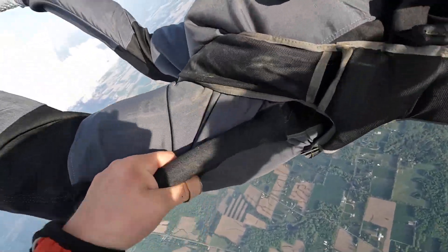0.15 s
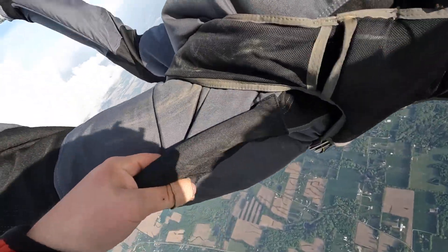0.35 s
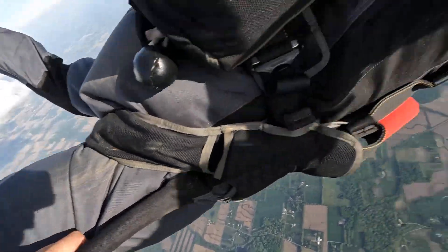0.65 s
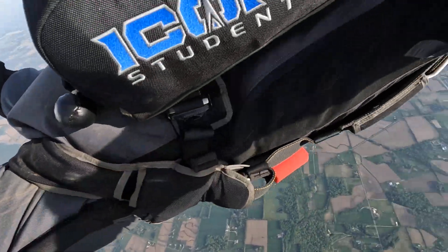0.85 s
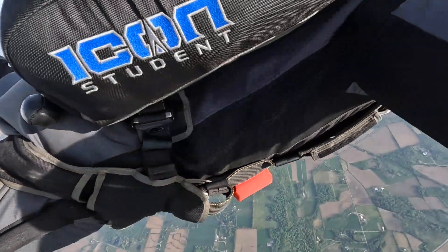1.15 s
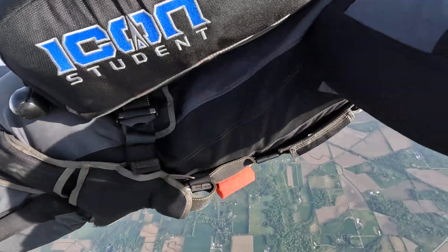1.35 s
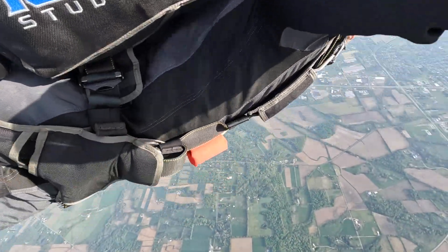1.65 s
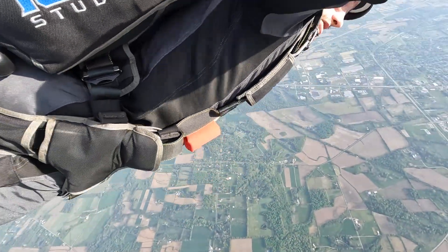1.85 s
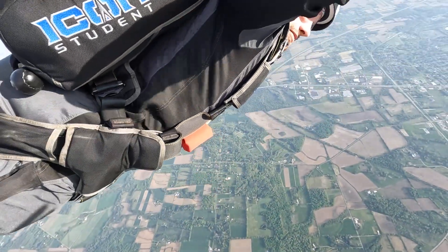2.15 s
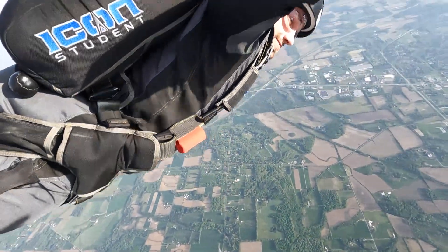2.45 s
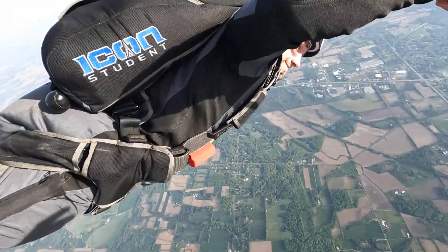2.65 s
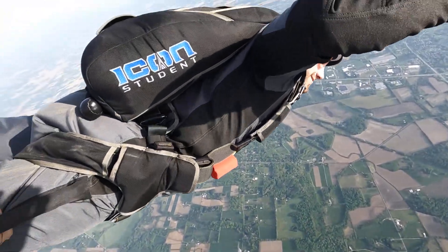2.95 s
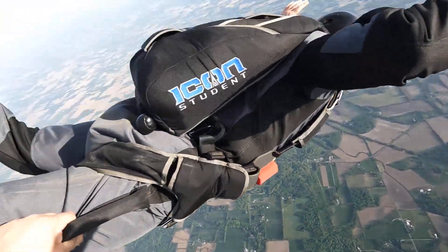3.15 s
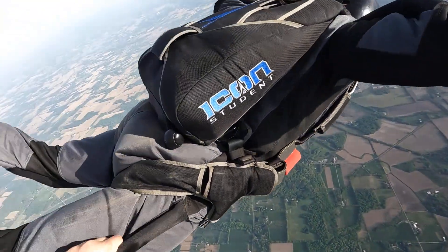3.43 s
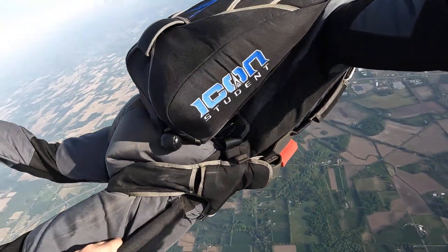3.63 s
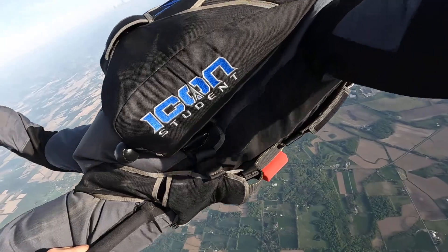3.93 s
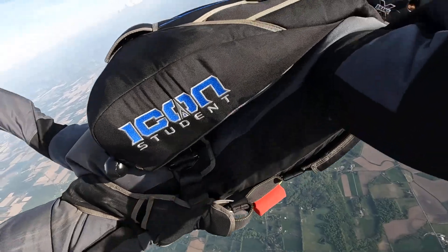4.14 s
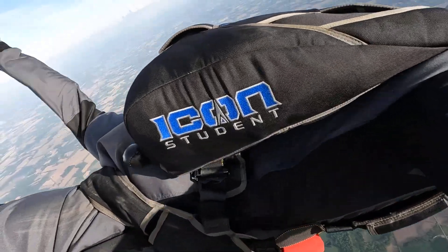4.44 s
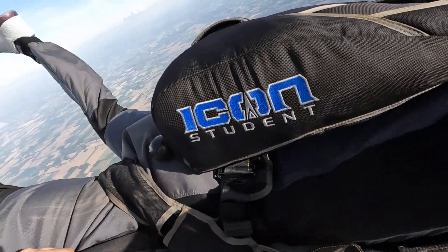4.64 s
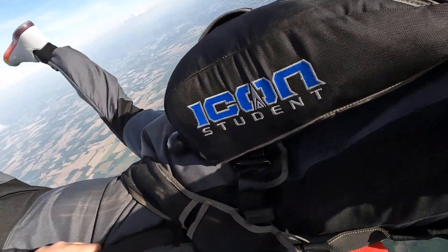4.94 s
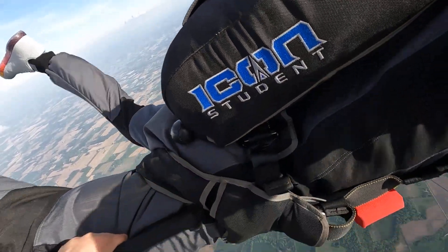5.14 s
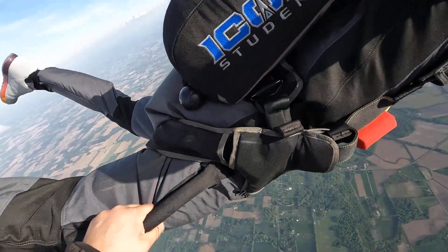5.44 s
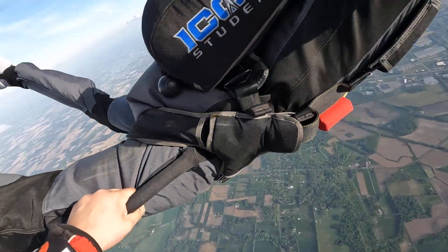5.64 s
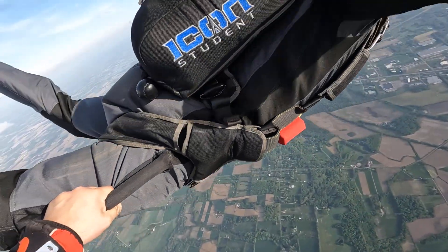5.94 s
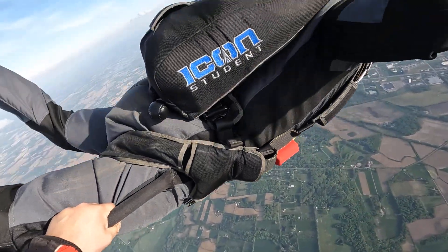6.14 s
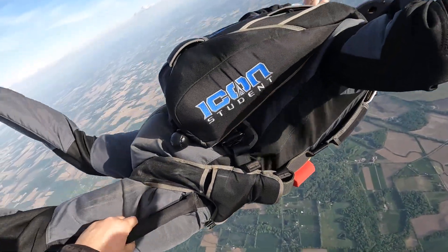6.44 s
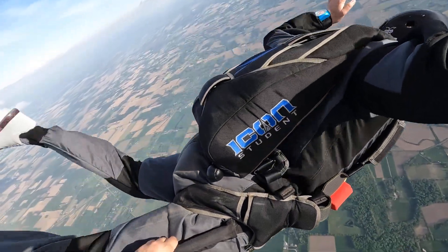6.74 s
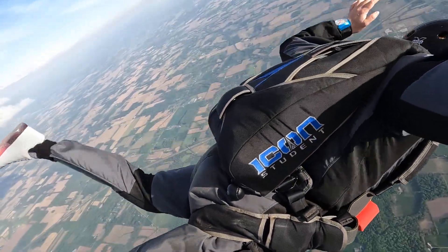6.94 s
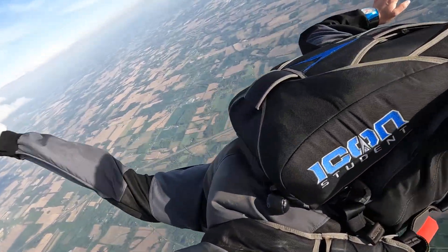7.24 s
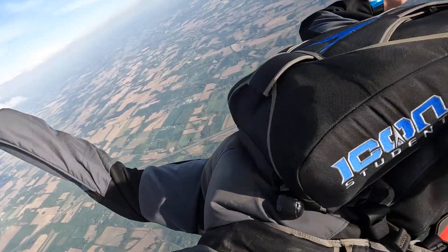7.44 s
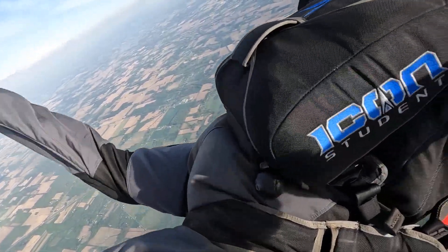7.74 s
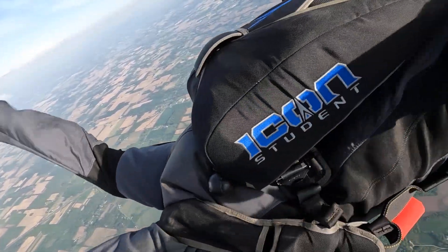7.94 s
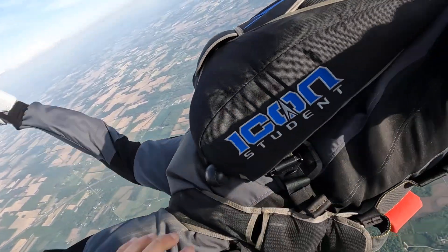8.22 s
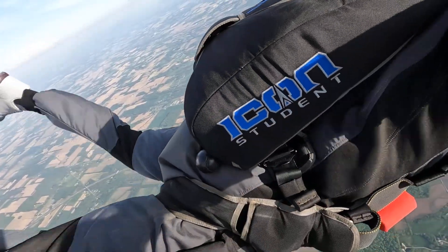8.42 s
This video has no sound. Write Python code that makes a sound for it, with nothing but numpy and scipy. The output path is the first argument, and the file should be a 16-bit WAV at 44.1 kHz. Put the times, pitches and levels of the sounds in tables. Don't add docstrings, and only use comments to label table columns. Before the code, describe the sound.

Loud freefall wind roars and buffets against a helmet-mounted microphone, with brief bright hissing blasts near the start and light strap snaps throughout.

```python
import sys
import numpy as np
from scipy import signal
from scipy.fft import rfft, irfft, next_fast_len
from scipy.io import wavfile
from scipy.ndimage import uniform_filter1d, minimum_filter1d, map_coordinates

SR = 44100
rng = np.random.default_rng(int(sys.argv[2]) if len(sys.argv) > 2 else 0)


def store_wav(level_fs):
    pcm = np.round(np.clip(np.atleast_2d(level_fs), -1, 1) * 32767)
    wavfile.write(sys.argv[1], SR, pcm.T.astype(np.int16))


def voltage_ratio(decibels):
    exponent = np.asarray(decibels, float) / 20
    return 10 ** exponent


N = 378378

# start in seconds, peak in dB, low body in dB over the peak.
SNAPS = [(0.2673, -40, 21.5), (0.3197, -39, 9), (0.339, -34, 19.5), (0.5217, -32, 6), (0.646, -39, 10),
         (0.7752, -38.5, 22), (0.803, -40, 12), (0.8185, -39, 14), (0.936, -38, 7), (0.9862, -35.5, 11.5),
         (1.0392, -33, 12), (2.3387, -41, 11), (2.3813, -36.5, 10), (2.956, -38, 11.5),
         (3.175, -40.5, 15.5), (3.3137, -35, 14), (3.5386, -34, 17.5), (4.7731, -36, 15),
         (4.997, -36.5, 14), (5.5194, -36.5, 14), (5.5876, -36, 13), (5.693, -37.5, 15), (6.6079, -33, 11),
         (6.6934, -33.5, 8), (7.3392, -33, 11), (7.395, -37, 17), (7.6225, -33.5, 12), (7.914, -36, 14),
         (8.0162, -38, 19), (8.312, -35, 18)]
# start in seconds, peak in dB.
FLAPS = [(0.0593, -39.5), (.195, -36), (0.737, -40), (.851, -41), (.868, -47), (.883, -48), (.9188, -46),
         (.949, -41), (1.099, -43.5), (1.955, -40), (2.096, -42), (2.678, -37.5), (2.868, -47),
         (2.92, -38.5), (3.253, -41), (3.4027, -40), (3.672, -39.5), (3.8, -37), (3.9527, -39),
         (4.3223, -38.5), (5.348, -37), (5.7967, -38.5), (6.5173, -38.5), (7.825, -37.5), (7.8694, -40),
         (7.9898, -39), (8.082, -36.5), (8.324, -37), (8.3573, -40), (8.4806, -38)]
# start in seconds, peak in dB.
TICKS = [(0.1092, -46), (0.1306, -43), (0.7044, -36), (0.7854, -43.5), (0.969, -42.5), (1.0044, -43),
         (1.1157, -46), (1.7025, -45), (2.3164, -46), (2.3262, -40), (2.5701, -44), (2.582, -49),
         (2.6075, -46), (2.8344, -39), (3.0036, -41.5), (3.0264, -42), (3.1213, -44), (3.239, -43),
         (3.3757, -47), (3.4436, -42.5), (3.476, -41.5), (3.5588, -46), (3.6136, -38), (3.8174, -45.5),
         (4.2883, -38), (4.3494, -45), (4.555, -44.5), (4.7132, -40), (4.7376, -37), (4.9781, -35.5),
         (5.1696, -45), (5.3614, -47), (5.4036, -52), (5.5347, -40), (5.6014, -36), (5.6244, -45),
         (5.6401, -39.5), (5.7112, -40), (5.9292, -38.5), (5.9938, -39), (6.1145, -41), (6.4653, -37),
         (6.487, -42), (6.5605, -40), (6.643, -39.5), (6.7764, -42.5), (6.8432, -37), (6.9075, -40),
         (7.0256, -39.5), (7.1023, -54), (7.221, -42.5), (7.2664, -38.5), (7.4594, -40), (7.5567, -38),
         (7.7488, -40), (7.7904, -42), (8.1692, -37), (8.2157, -40), (8.2433, -37), (8.275, -39)]


def unit(x):
    return x / np.sqrt(np.mean(x ** 2) + 1e-20)


def curves(rows):
    s, *cols = np.transpose(rows)
    return [np.interp(np.arange(N) / SR, s, c) for c in cols]


def wobble(rate):
    knots = rng.standard_normal(int(N * rate / SR) + 4)
    return map_coordinates(knots, [np.arange(N) * rate / SR])


def coloured(x, spectrum):
    m = next_fast_len(len(x) + 8192)
    f, db = np.transpose(spectrum)
    bins = np.log(np.fft.rfftfreq(m, 1 / SR) + 1)
    gain = voltage_ratio(np.interp(bins, np.log(f + 1), db, -120, -120))
    return irfft(rfft(x, m) * gain, m)[:len(x)]


def rush(spectrum, patchy_db, eddy_db):
    z = signal.stft(rng.standard_normal(N), nperseg=512)[2]
    field = uniform_filter1d(rng.standard_normal(z.shape), size=6, axis=0)
    field = uniform_filter1d(field, size=8, axis=1)
    noise = signal.istft(z * voltage_ratio(patchy_db * unit(field)), nperseg=512)[1][:N]
    return unit(coloured(noise * voltage_ratio(eddy_db), spectrum))


def crackle(rate):
    spikes = (rng.random(N) < rate / SR) * rng.exponential(1, N)
    return np.convolve(spikes, np.hanning(70), "same")


def eddies():
    # seconds, depth factor.
    chop = [(0, 1.5), (.62, 0.66), (.7, 1.5), (.96, 1.6), (.99, .5), (1.035, .5), (1.06, 1.5), (1.12, 1.64),
            (1.2, 0.31), (1.7, 0.6), (2.3, 0.96), (8.58, 1.1)]
    depth, = curves(chop)
    return depth * np.array([wobble(24), wobble(60), wobble(250), crackle(rate=120)])


def slack():
    # middle in seconds, depth in dB (negative = bunching), half length in seconds.
    slack_moments = [(.45, -0.5, 0.066), (0.753, -4, 0.054), (1.004, 1, .05), (1.166, 7, 0.041),
                     (1.46, 2.5, 0.12), (1.75, 2.5, 0.074), (2.0, -0.5, 0.054), (2.445, -2.5, 0.065),
                     (2.6, 2, 0.047), (2.796, 1.5, .08), (3.118, 0, .08), (3.25, -3, .05),
                     (3.706, -2.5, 0.11), (3.954, -1.5, .06), (4.31, -3.5, 0.047), (4.424, 3, 0.045),
                     (4.546, 4, 0.069), (4.728, -5, .05), (4.83, 9, 0.03), (4.976, -3.5, 0.027),
                     (5.031, 4, .035), (5.163, 4.5, 0.077), (5.328, -3.5, 0.053), (5.43, 10, 0.046),
                     (5.6, -1.5, .06), (6.096, 2, .06), (6.381, 3, .05), (6.652, -0.5, .12),
                     (7.095, 4, 0.11), (7.604, -1, 0.13), (8.001, -2, .06), (8.501, -1.5, .04)]
    t = np.arange(0, N, 32) / SR
    dips = sum(-db * np.exp(-2 * ((t - s) / half) ** 2) for s, db, half in slack_moments)
    return np.interp(np.arange(N) / SR, t, dips)


def level(scale, db, exposed):
    # seconds, strength in dB, fineness in dB per step of eddy
    # scale, wake fineness in dB per step of eddy scale, port exposure in dB.
    attitude = [(0.03, 1.5, -0.76, -2.5, -1.5), (.3, 0, 0.8, -0.5, 1), (.62, -0.5, 1, -1.5, 4),
                (.76, -2.5, -0.2, -0.5, 5.5), (1.1, -2, 0.16, .5, 3), (1.2, -0.5, -.5, -2, -2.5),
                (1.6, -0.5, -0.14, -0.5, -1.5), (1.95, 1, -0.5, -1, -2), (2.4, 2, -1, 1, -6),
                (2.9, 1, -0.5, 0, -3), (3.5, 0.5, 0, -0.5, -0.5), (4.2, -2.5, 1, -2, 2.5),
                (4.6, 3, -1.45, 0.5, -7), (5.3, 1, 0, -3, -2), (5.6, -0.5, .5, 1, 2), (6.5, -3, 1.5, -1, 6),
                (7.2, -2, 1.36, -1, 5), (8.55, -1, 0.43, 0.5, 1.5)]
    # middle in seconds, depth in dB, half length in seconds, place on
    lulls = [(0.75, 4, .02, 1), (0.835, 7.5, 0.029, 4), (.9, 8, 0.034, 3.5), (1.065, 10, 0.019, 3.5),
             (1.155, 4.5, 0.034, 4), (1.797, 5.5, 0.043, 4.5), (2.017, 10, 0.049, 4),
             (2.418, 5.5, 0.042, 5), (2.593, 18, 0.016, 4), (2.703, 6, 0.018, 3.5),
             (0.264, 9.5, 0.012, 5.5), (3.195, 15, 0.026, 4), (3.216, 5, 0.024, 3.5),
             (3.272, 9, 0.046, 3.5), (3.728, 12, 0.019, 3.5), (5.377, 6, .015, 4.5), (4.298, 7, 0.026, -3),
             (4.637, -3, 0.075, -6), (4.826, 15, 0.044, -2.5), (5.02, 7, 0.045, 5), (5.42, 3, 0.081, -0.5),
             (5.669, 8, .02, 3), (5.74, 9.5, 0.032, 4), (5.846, 6.5, 0.024, 3.5), (6.333, 10, 0.039, 4),
             (6.39, 4, 0.056, 1.5), (6.723, 2, 0.028, -2), (8.159, 17, 0.009, 0.3), (8.399, 5, 0.035, 3.5),
             (8.504, 13, 0.026, 3.5), (1.396, 1.5, 0.052, 4.5), (2.432, 4.5, .06, 2),
             (3.657, 0.5, 0.1, 1.5), (4.41, 2.5, 0.065, 4), (5.024, 6, 0.034, 0.5), (5.104, 1.5, .05, 1.5),
             (5.45, 2, .04, -0.5), (6.856, 0.5, .2, 2.2), (7.1, 1, 0.16, 4), (7.38, 2.5, 0.085, 4.5),
             (4.75, 2, 0.066, 3.5), (1.014, 1.5, 0.017, 3), (2.776, 3.5, 0.021, 2.6),
             (6.106, 1, 0.0099, 2.5), (7.958, -2, .012, 3.5), (8.54, 2.5, 0.024, -1.5)]
    # middle in seconds, rise in dB, half length in seconds, place on
    gusts = [(0.465, 5.5, 0.079, 0.5), (.8, 2, .1, 2.5), (.79, -1, 0.024, 2), (1.01, 8, 0.03, 2),
             (1.11, 6, 0.019, 2), (1.517, 6.5, 0.026, 3.5), (1.776, 8.5, 0.017, 2), (1.942, 6, .03, 3.5),
             (2.07, 6, 0.027, 3.5), (2.283, 1.5, 0.069, 4), (2.547, 7, .035, 4.5), (2.785, 8, 0.03, 4),
             (2.96, 4.5, 0.05, 2), (3.18, 3, .04, 2), (3.255, 6, 0.012, 3), (3.319, 13, 0.016, 7),
             (3.833, 8, .04, 0.5), (4.206, 14, 0.017, -0.5), (4.323, 6, 0.053, 1.5), (4.75, 7, .03, 0.5),
             (4.994, 8.5, 0.03, 1.5), (5.351, 6.5, 0.028, 3), (5.618, 4.5, 0.034, 7), (6.454, 14, 0.092, 8),
             (6.702, 9, 0.0066, 3.5), (6.8, 4.5, 0.052, 6), (8.213, 4, 0.045, 3.75), (.3, 0.5, .12, 1),
             (1.67, 0, .08, 0), (2.32, 3, .03, 1.5), (2.77, 2.5, .04, 0), (4.1, 3.5, .12, 5.7),
             (4.55, 1, .12, 5), (4.78, 5, .04, 1.5), (5.3, -3, .05, 1.5), (5.87, 4.5, .02, 3.5),
             (7.12, 4.5, .08, 4.5), (7.56, 0, .1, 1), (7.6, 2, .1, 7.5), (1.3, 1.5, .12, 3.5),
             (1.65, 1.5, .08, 6), (4.465, 4.5, 0.049, 4.5), (4.652, 1.5, .06, 7), (.93, 1, .015, 5),
             (3.565, 5.5, 0.013, 4), (3.958, 3, 0.0085, 4), (5.694, 2, 0.011, 3.5), (7.394, 3, 0.0095, 2.5),
             (1.07, 5, .02, 9), (.8, 2, .1, 2.5), (4.253, 3.5, 0.12, 6), (2.32, 2, 0.022, 5.5),
             (2.776, 3.5, 0.033, 3), (7.124, 1.5, .05, 5.7)]
    reach = 1.36
    abrupt = 0.28

    strength_db, fineness, wake, exposure_db = curves(attitude)
    out = db + strength_db + fineness * (scale - 2.5)
    out = out + exposed * (exposure_db + wake * (scale - 1.2))
    t = np.arange(N) / SR
    for push, rows in (-1.14, lulls), (0.84, gusts):
        for s, push_db, half, at in rows:
            before, after = half * (1 + push * abrupt), half * (1 - push * abrupt)
            near = slice(max(0, int((s - before) * SR)), int((s + after) * SR))
            side = np.where(t[near] < s, before, after)
            bump = np.cos(np.pi / 2 * (t[near] - s) / side) ** 2
            felt = np.exp(-((scale - at) / reach) ** 2 / 2)
            out[near] += push * push_db * felt * bump
    return out


def shedding():
    # seconds, pitch in Hz, level in dB.
    vortex_row = [(0, 70.8, -38), (.6, 69.2, -34), (1.2, 80, -38), (2.5, 90, -32), (3.3, 95.2, -24.5),
                  (3.8, 100, -26), (4.5, 110, -32), (5.4, 110, -39), (5.7, 114.7, -26), (6.3, 105, -28),
                  (6.55, 110, -21.5), (6.9, 110.8, -22), (7.2, 120, -33), (7.6, 140, -24), (8.1, 130, -25),
                  (8.58, 109.4, -28)]
    hz, db = curves(vortex_row)
    wander = .12 * (wobble(14) + wobble(40))
    turns = np.cumsum(hz * np.exp(wander)) / SR
    return voltage_ratio(db + 2.5 * wobble(25)) * np.sin(2 * np.pi * turns)


def snaps():
    # Hz, dB.
    crack_spectrum = [(2000, -19), (3500, -9), (6000, -17), (8500, -11), (11500, -14), (14000, -42)]
    body_spectrum = [(700, -12), (1400, 11.5), (3500, 0), (6000, -14), (11000, -47)]
    rows = [*SNAPS]
    rows += [(s, db, 17) for s, db in FLAPS]
    rows += [(s, db, 15.5) for s, db in TICKS]
    length = 900
    t = np.arange(length) / SR
    top, body = np.zeros(N + length), np.zeros(N + length)

    def cluster(lates, t60, rise):
        total = 0
        for n, late in enumerate(lates):
            fade = voltage_ratio(-60 * abs(t - late) / t60)
            onset = 1 - np.exp(-np.clip(t - late, 0, 1) / rise)
            total = total + voltage_ratio(-2.5 * (2.5 - n)) * fade * onset
        return total

    for s, db, body_db in rows:
        top_noise, body_noise = rng.standard_normal((2, length))
        k, u, v = rng.random(3)
        linger = 1 + 0.79 * k
        lates = np.array([0, .5 + u, 1 + u + v]) * .003
        start = round(s * SR)
        top[start:][:length] += voltage_ratio(db + 7.5) * top_noise * cluster(lates, .0045 * linger, .0004)
        body[start:][:length] += voltage_ratio(db + body_db + 6) * body_noise * cluster(lates, .007 * linger, .0009)
    return coloured(top, crack_spectrum)[:N] + coloured(body, body_spectrum)[:N]


def jets():
    # start in seconds, hold in seconds, sag over the hold in dB,
    # level in dB.
    jet_hits = [
        (0.338, 0.11, 0.5, -31),
        (0.444, .03, 5, -32.5),
        (0.493, .012, 0.5, -46),
        (0.52, 0.043, 1, -33.5),
        (0.573, 0.032, -3, -34.5),
        (0.65, 0.006, 3, -29.5),
        (0.66, .008, 2, -30),
        (0.687, .004, 1, -36.5),
        (0.703, .005, 4, -39),
    ]
    # seconds, level in dB, share of the upper pitch from 0 to 1.
    edge_tone = [(.2, -86, .1), (.24, -73, .1), (.32, -68, .9), (.36, -61, .3), (.5, -60, 0.4),
                 (.64, -62, 0.2), (.7, -68, .05), (.78, -67, .9), (.84, -86, .9)]
    # Hz, dB per Hz.
    jet_spectrum = [(700, -13), (1400, -12), (3000, -6.5), (5000, -14), (7000, -26), (10000, -44),
                    (13000, -64), (14500, -86)]
    sheen_spectrum = [(7000, -15), (9000, 2), (10000, -5.5), (11000, -9), (12000, -29)]
    t = np.arange(N) / SR
    hits_db = []
    for s, hold, sag_db, db in jet_hits:
        attack = 1800 * np.clip(s - t, 0, 1)
        sag = sag_db * np.clip((t - s) / hold, 0, 1)
        release = 650 * np.clip(t - s - hold, 0, 1)
        hits_db.append(db - attack - sag - release)
    jet_db = np.max(hits_db, axis=0)
    jet = voltage_ratio(jet_db + 5) * rush(jet_spectrum, patchy_db=0, eddy_db=1.3 * wobble(300) + 1.6 * wobble(80))

    sheen_db, upper = curves(edge_tone)
    low, high = (rush(np.multiply(sheen_spectrum, [shift, 1]), patchy_db=2.0, eddy_db=.8 * wobble(90))
                 for shift in (1, 1.17))
    return jet + voltage_ratio(sheen_db) * (np.sqrt(1 - upper) * low + np.sqrt(upper) * high)


def puffs():
    kicks = np.zeros(N)
    for s, db, *_ in [*SNAPS, *FLAPS, *TICKS]:
        kicks[round(s * SR)] = 0.1 * max(0, db + 41)
    t = np.arange(-SR // 20, SR // 20 + 1) / SR
    swell = np.exp(-(t / np.where(t < 0, 0.032, 0.0032)) ** 2)
    return signal.fftconvolve(kicks, swell, "same")


def stream(eddy):
    # seconds, level in dB, share of the upper pitch 0 to 1.
    cavity = [(0, 9, 0.14), (.3, -3.5, 0.46), (.62, 4, 0.36), (.76, -4, 0.5), (1.1, -2, 0.2),
              (1.2, 4, 0.04), (1.45, 6, 0.1), (1.7, 3, 0.13), (1.9, -4.5, 0.44), (2.5, 3.5, 0.01),
              (3.3, 4, 0.15), (4.2, 0, 0.55), (4.55, 6, 0.7), (5.2, 2, 0.6), (5.7, -3, 0.75),
              (6.5, -3, 0.74), (7.1, -3.5, 0.83), (8.55, 0, 0.67)]
    # Hz, dB per Hz.
    roar_spectrum = [(280, -18), (460, 0.5), (700, 0), (1000, -3.5), (1450, -15.5), (2500, -120)]
    whoosh_spectrum = [(700, -10), (1100, 2.5), (1500, -1), (2100, -11), (2900, -20.5), (5000, -120)]
    hiss_spectrum = [(1020, -2), (1700, -3), (2500, -6), (3300, -9), (4200, -18), (5500, -27),
                     (7000, -37.5), (8500, -52), (9775, -77)]
    fizz_spectrum = [(6000, -7), (8500, -4.5), (9500, 0), (11000, 2), (12000, 1.5), (13000, -7),
                     (14000, -20), (15500, -35)]
    hollow_db, upper = curves(cavity)

    roar_db = level(scale=2.93, db=-26, exposed=0) - 0.2 * hollow_db
    roar = voltage_ratio(roar_db) * rush(roar_spectrum, patchy_db=-0.62, eddy_db=[0.28, 0.71, 1.97, 0.33] @ eddy)

    low, high = (rush(np.multiply(whoosh_spectrum, [shift, 1]), patchy_db=1.3,
                      eddy_db=[0.53, 0.26, 0.81, 0.52] @ eddy) for shift in (.9, 1.22))
    whoosh_db = level(scale=5.4, db=-32, exposed=0) + hollow_db
    whoosh = voltage_ratio(whoosh_db) * (np.sqrt(1 - upper) * low + np.sqrt(upper) * high)

    hiss_db = level(scale=5.71, db=-38.5, exposed=0) + puffs()
    hiss = voltage_ratio(hiss_db + 3) * rush(hiss_spectrum, patchy_db=1.06, eddy_db=[0.6, 1.24, 1.4, 2.1] @ eddy)

    fizz_db = -70.5 + 0.65 * (hiss_db - np.mean(hiss_db))
    fizz = voltage_ratio(fizz_db) * rush(fizz_spectrum, patchy_db=0.2, eddy_db=[1.4, 1.0, 1.3, 1.9] @ eddy)
    return roar + whoosh + hiss + fizz


def levelled(x, share):
    size = np.abs(signal.hilbert(x, next_fast_len(N))[:N])
    return unit(x / (size + 0.27) ** share)


def buffeting(eddy, slack_db):
    # Hz, dB per Hz.
    buffet_spectrum = [(11, -32), (18, -5.5), (35, 2), (55, 3.5), (80, -4), (115, -11), (200, -120)]
    thump_spectrum = [(50, -29), (82, -0.5), (125, -1.5), (190, -6), (280, -20.5), (500, -120)]
    rumble_spectrum = [(130, -19.5), (210, -1), (300, -2), (430, -7), (620, -24.5), (1100, -120)]

    buffet = levelled(rush(buffet_spectrum, patchy_db=0.0, eddy_db=.6 * wobble(7)), share=0.3)
    buffet_db = level(scale=0, db=-20, exposed=0.91)

    thump_eddy_db = [1.02, 0.89, 0.14, .1] @ eddy + 0.33 * wobble(7.3)
    thump = rush(thump_spectrum, patchy_db=1.17, eddy_db=thump_eddy_db)
    thump_db = level(scale=2.57, db=-20.5, exposed=0.82) + slack_db

    rumble_eddy_db = [0.36, 1.3, 0.79, .4] @ eddy + 1.27 * wobble(8)
    rumble = rush(rumble_spectrum, patchy_db=-0.53, eddy_db=rumble_eddy_db)
    rumble_db = level(scale=2.17, db=-24, exposed=0.58) + 0.54 * slack_db
    return voltage_ratio(buffet_db) * buffet + voltage_ratio(thump_db) * thump + voltage_ratio(rumble_db) * rumble


def scene():
    eddy, slack_db = eddies(), slack()
    drone = voltage_ratio(slack_db) * shedding()
    air = stream(eddy) + buffeting(eddy, slack_db)
    return (drone + snaps() + jets() + air)[None]


def band_limit(x):
    return signal.sosfilt(signal.butter(12, 14800, fs=SR, output="sos"), x)


def record(dry):
    power = np.abs(uniform_filter1d(dry ** 2, size=700))
    slow = np.abs(uniform_filter1d(dry ** 2, size=9000))
    gain = ((slow + 1e-9) / (power + .15 * slow + 1e-9)) ** 0.17
    x = voltage_ratio(0.98) * dry * gain
    needed = np.minimum(1, .64 / (np.abs(x) + 1e-9))
    x = x * uniform_filter1d(minimum_filter1d(needed, size=160), size=120)
    return band_limit(x)


dry = scene()
out = record(dry)
store_wav(out)
```